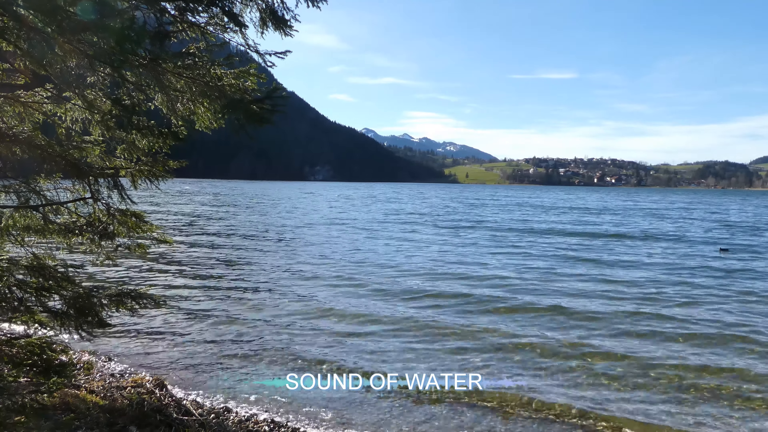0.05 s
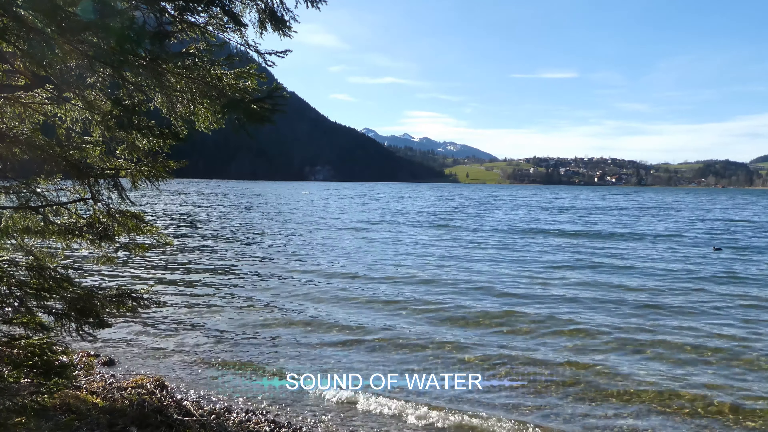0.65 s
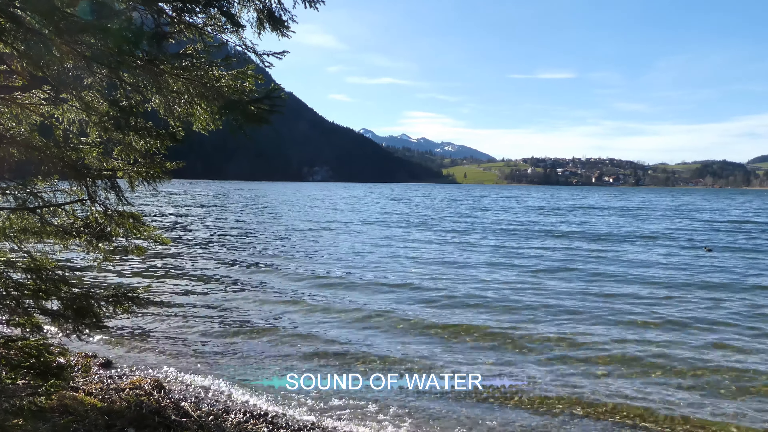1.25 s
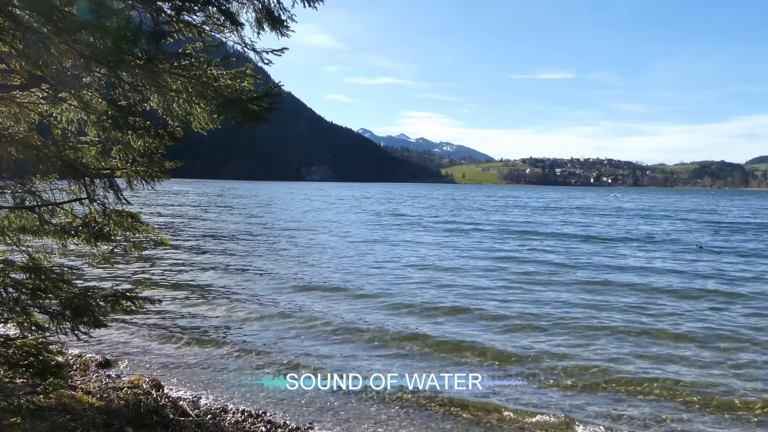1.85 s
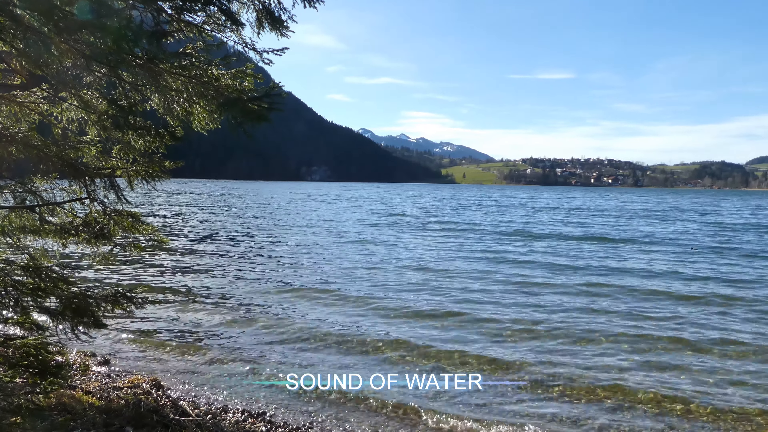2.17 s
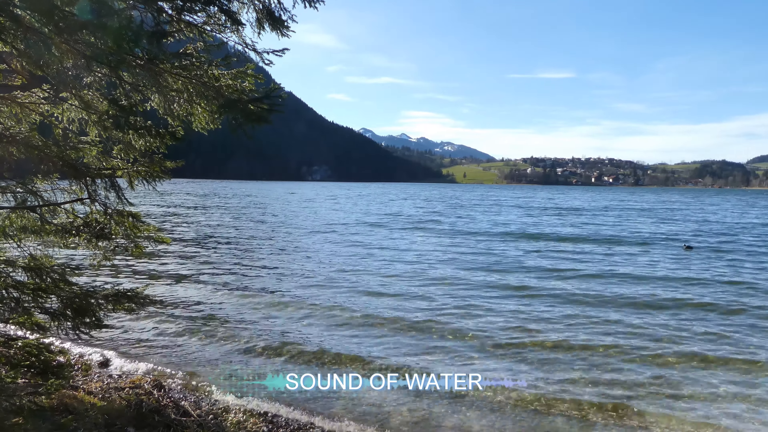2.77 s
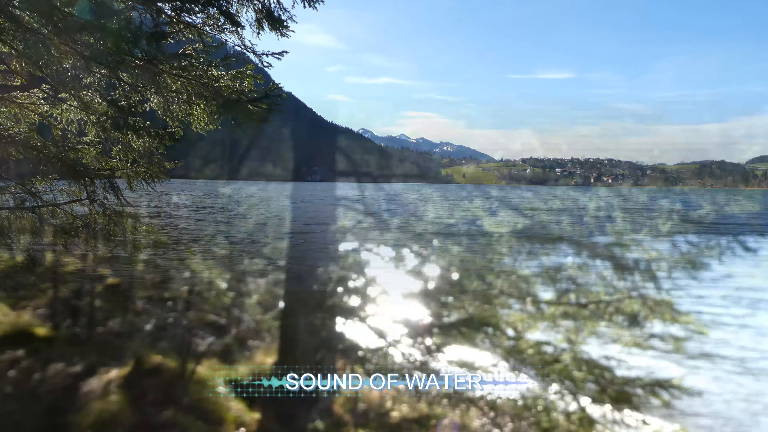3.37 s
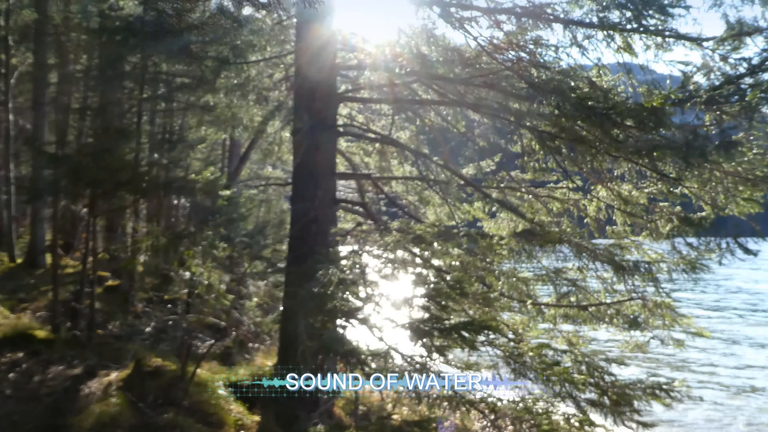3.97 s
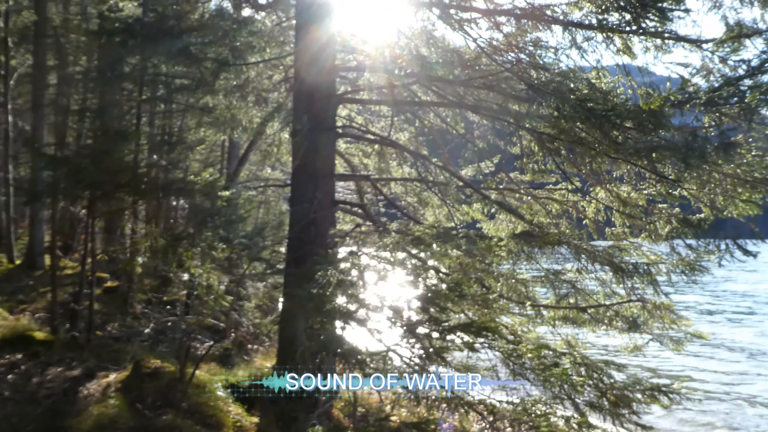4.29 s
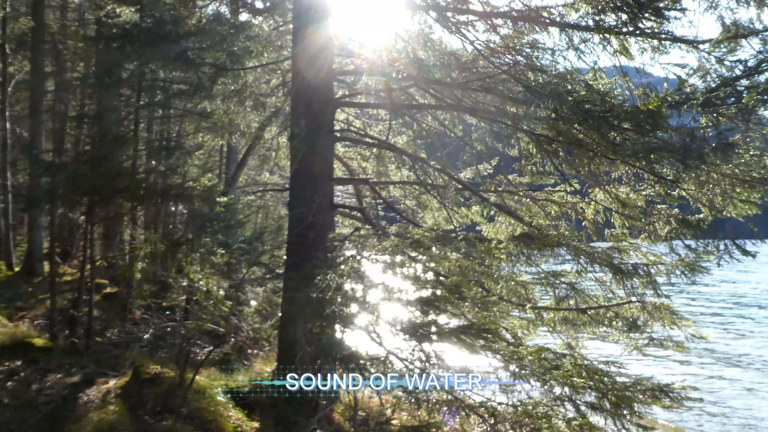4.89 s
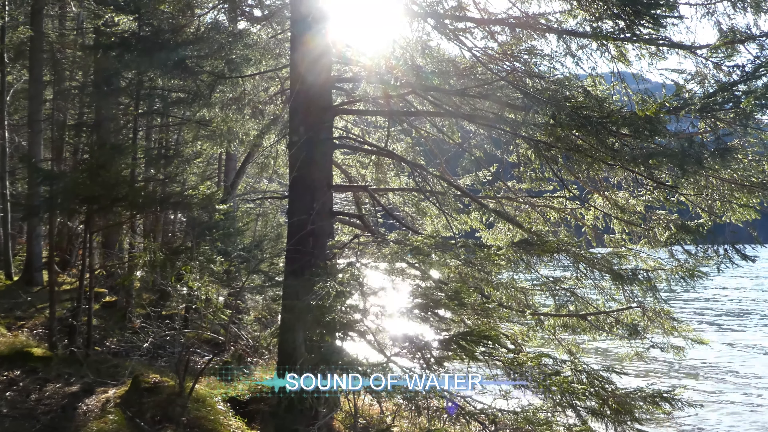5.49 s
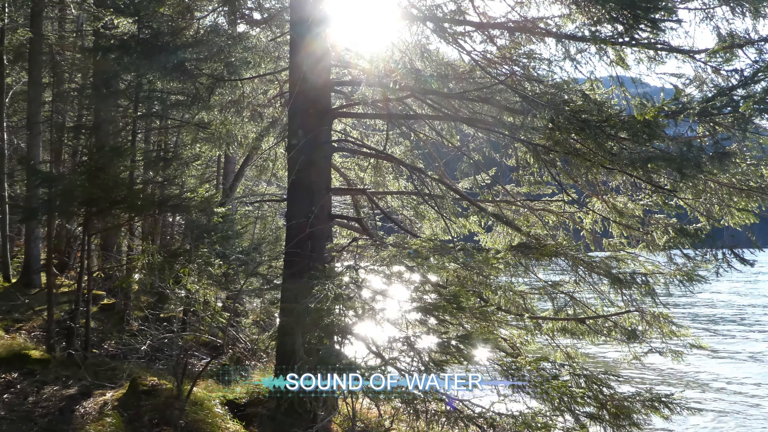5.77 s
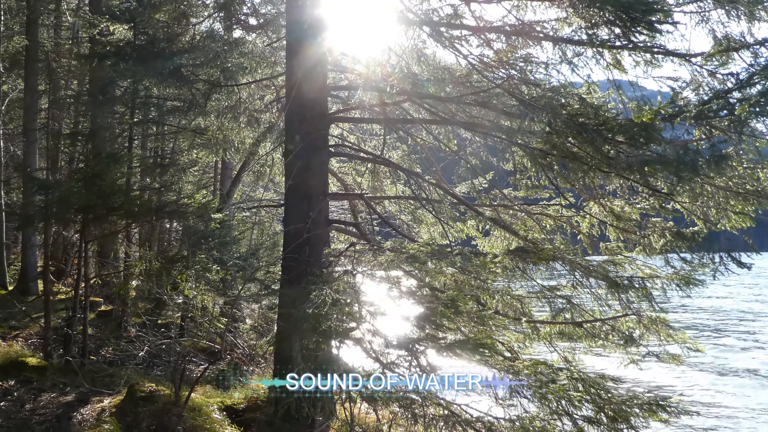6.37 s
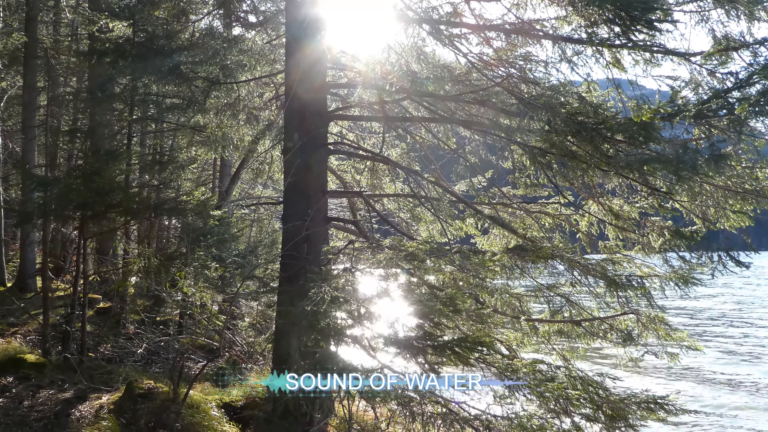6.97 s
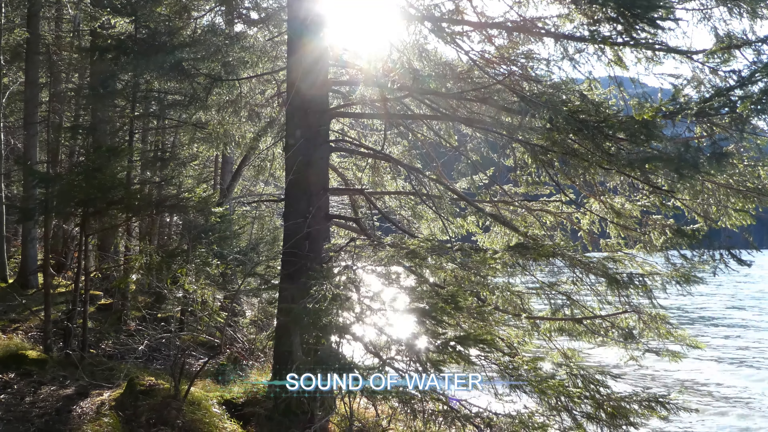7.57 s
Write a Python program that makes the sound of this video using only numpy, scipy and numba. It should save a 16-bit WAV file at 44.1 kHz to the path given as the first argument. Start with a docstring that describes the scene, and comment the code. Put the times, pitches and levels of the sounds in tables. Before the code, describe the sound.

Small lake waves wash onto a pebbly shore close by, in an uneven rhythm throughout. A wave breaks right at the start with a cluster of slaps, a soft thump and a bubbly gurgle, then fizzes up the stones. More splashes follow from about 1.3 to 2 seconds, with a smaller one near 2.6. Light gusts flutter on the microphone during these first three seconds.

Between 3 and 3.6 seconds the sound blends smoothly into a more sheltered shore and the gusts fade. A wave sloshes in around 3.5 to 3.9 seconds, followed by a lull. Further waves lap and gurgle from 5 to 6 seconds, ease off, then build to another splash near 7.5. Single drops tick on the stones and pebbles click faintly in the wash, over a very faint steady rush from across the lake.

```python
"""Small lake waves break on a pebbly shore; after three seconds the scene dissolves to a sheltered beach.
Each wave gurgles with big bubbles as it folds over, washes up the stones as a cloud of small ones
and fizzes out in spray. Crests thump and slap, small folds slosh, pebbles knock, drops tick on stones.
On the first, open beach gusts flutter on the microphone. A faint wash carries from across the lake."""
import sys
import numpy as np
from scipy import signal
from scipy.fft import rfft, irfft
from scipy.io import wavfile
from scipy.ndimage import uniform_filter1d
from numba import njit

SR = 44100
rng = np.random.default_rng(int(sys.argv[2]) if len(sys.argv) > 2 else 0)


def inscribe(sig):
    """Save sig as 16-bit PCM at rate SR to the path in sys.argv[1].

    A 1-D sig is mono; a 2-D sig holds one channel per row.
    Samples are clipped to [-1, 1] before scaling.
    """
    pcm = np.round(np.clip(np.atleast_2d(sig).T, -1, 1) * 32767)
    wavfile.write(sys.argv[1], SR, pcm.astype(np.int16))


N = 341334
T = np.arange(N) / SR
HZ = np.maximum(np.arange(N // 2 + 1) * SR / N, 1)
SIDES = np.array([[1], [-1]])  # left, right; pan is left minus right
DISSOLVE_S = (2.9, 3.57)  # open to sheltered beach


def undb(db):
    """Decibels to gain."""
    return 10 ** (np.asarray(db) / 20)


def unit(x):
    """Scale to rms 1."""
    return x / np.sqrt(np.mean(x ** 2))


def by_pitch(table):
    """Interpolate (f/Hz, value) rows at every FFT bin."""
    hz, value = np.transpose(table)
    return np.interp(np.log(HZ), np.log(hz), value)


def shape(x, gain):
    """Filter by one gain per FFT bin."""
    return irfft(rfft(x) * gain, N)


def below(hz, order):
    """Soft low-pass curve, 1/2 at hz."""
    return 1 / (1 + (HZ / hz) ** order)


def walk(rate_hz):
    """Random steps, smoothed twice; spread near 1."""
    hold = int(SR / rate_hz)
    steps = np.repeat(rng.standard_normal(N // hold + 1), hold)
    return 1.3 * uniform_filter1d(uniform_filter1d(steps, hold), hold)[:N]


def swells(peak_s, level_db, rise_s, hold_s, fall_s):
    """Summed power of events that rise, hold and fall exponentially."""
    t = np.linspace(0, N / SR, 2000)
    age_s = t[:, None] - peak_s
    fade = np.maximum(-age_s, 0) / rise_s + np.maximum(age_s - hold_s, 0) / fall_s
    return np.interp(T, t, np.sum((undb(level_db) * np.exp(-fade)) ** 2, axis=1))


@njit
def ring(start_s, hz, cycles, size, rise):
    """Bubbles: sines that swell in one cycle and decay 50 dB as pitch climbs by the fraction rise."""
    out = np.zeros((2, N))
    for k in range(len(start_s)):
        length = int(cycles[k] * SR / hz[k]) + 2
        step = 2 * np.pi * hz[k] / SR
        phasor = 1 + 0j
        pole = np.exp(1j * step - 5.76 / length)
        glide = np.exp(1j * step * rise / length)
        first = max(int(start_s[k] * SR), 0)
        for i in range(first, min(first + length, N)):
            phasor *= pole
            pole *= glide
            swing = phasor.imag * min((i - first) * hz[k] / SR, 1.)
            out[0, i] += size[0, k] * swing
            out[1, i] += size[1, k] * swing
    return out


def valley():
    """Faint steady wash of water and air from across the lake."""
    # far-shore spectrum: f/Hz, level/dB
    spectrum = [(20, -16), (45, -17), (90, -10), (128, -0.5), (170, 1), (300, -11), (480, 0), (640, 2.5),
                (900, -4.5), (2000, -14), (6000, -27)]
    common, *own = shape(rng.standard_normal((3, N)), undb(by_pitch(spectrum)))
    level_db = np.interp(T, DISSOLVE_S, (-48, -47))
    return undb(level_db) * unit(common + np.array(own))


def wind():
    """Eddies push on one microphone port and pull on the other; gusts hit fast and die away."""
    # eddy spectrum: f/Hz, level/dB
    eddies = [(25, -28), (50, 0), (85, 6), (130, 8.5), (190, 4.5), (280, -3), (600, -61)]
    # gusts: t/s, level/dB, fall/s
    gusts = [(.02, -32, 0.054), (.27, -44, 0.16), (.84, -37, 0.17), (1.41, -39.5, .15), (1.53, -35.5, 0.15),
             (1.81, -33.5, 0.21), (2.08, -41, 0.15), (2.58, -40, 0.14), (2.68, -34, 0.033),
             (2.79, -32.5, 0.1), (3.02, -44, 0.24)]
    peak_s, level_db, fall_s = np.transpose(gusts)
    gust_power = swells(peak_s, level_db, rise_s=0.041, hold_s=0.016, fall_s=fall_s)
    force = np.sqrt(gust_power + undb(-65) ** 2)  # over a steady breeze
    push, *own = shape(rng.standard_normal((3, N)), undb(by_pitch(eddies)))
    return force * (SIDES * unit(push) + undb(-9) * unit(np.array(own)))


def splashes(impacts, lag_s, scatter, cycles, spray_db, pan_db, count=8):
    """Each impact rings one main bubble and throws a quick spray of smaller and larger ones."""
    impact_s, level_db, main_hz = np.transpose(impacts)[:, :, None]
    late, pitch, swing, bearing = rng.standard_normal((len(impacts), 4, count)).transpose(1, 0, 2)
    is_spray = np.arange(count) > 0
    start_s = impact_s + is_spray * lag_s * np.abs(late)
    hz = np.minimum(main_hz * np.exp(is_spray * scatter * (pitch + .4)), SR / 3)
    size = undb(level_db) * np.where(is_spray, undb(spray_db) * swing, 1)
    pan = undb(SIDES * (pan_db + 3 * bearing.ravel()) / 2)
    return ring(start_s.ravel(), hz.ravel(), np.full(hz.size, float(cycles)), size.ravel() * pan, 0.27)


def drops():
    """Single drops tick on the stones."""
    # landings: t/s, level/dB, f/Hz
    landings = [(.206, -33, 8500), (.604, -35, 8000), (1.039, -39, 11200), (1.051, -33, 7200),
                (1.058, -35, 9200), (1.313, -36, 4800), (1.68, -34, 9000), (1.772, -32.5, 11000),
                (2.045, -34, 9200), (2.122, -34, 10000), (2.436, -34, 8100), (2.579, -40, 11000),
                (2.642, -37.5, 4980), (3.121, -38, 5000), (4.445, -40, 6360), (5.036, -30, 4110),
                (5.555, -35, 4350), (6.486, -45, 9460), (6.615, -47, 9100), (6.884, -40, 4650),
                (6.941, -39, 6220), (7.049, -35, 5100), (7.153, -38, 8500), (7.565, -31, 3540)]
    return splashes(landings, lag_s=0.0053, scatter=0.067, cycles=35, spray_db=-4.5, pan_db=-3)


def pebbles(flow, count=1400):
    """Small stones knock together at random, harder in a strong flow."""
    when, luck, bearing = rng.random((count, 3)).T
    strength = undb(-2 * np.log(luck + .02))
    knocks = np.zeros((2, N))
    knocks[:, (when * N).astype(int)] = strength * np.sqrt([bearing, 1 - bearing])
    clicks = shape(knocks, (1 - below(3000, order=4)) * below(6100, order=3))
    return undb(-55) * unit(clicks * np.sqrt(flow))


def sloshes(count=60, cycles=28.0, climb_oct=0.045):
    """Each small fold traps a swarm of bubbles near the pitch of its hollow, which climbs as it closes."""
    # folds: centre t/s, level/dB, length/s, hollow f/Hz, pitch spread/oct
    folds = [(0.189, -32, .04, 700, .25), (0.289, -32, .06, 692, 0.36), (0.731, -36.5, .05, 300, 0.22),
             (1.34, -36, .11, 665, 0.19), (1.443, -50.5, 0.088, 333, 0.24),
             (1.886, -33.5, 0.064, 343, 0.28), (2.201, -45, 0.14, 350, .2), (2.7, -42.5, .14, 332, 0.26),
             (3.69, -44, 0.11, 780, 0.23), (3.798, -33.5, 0.052, 890, .18), (3.887, -39, .07, 1050, 0.21),
             (3.952, -43, .1, 338, 0.13), (5.419, -37.5, 0.064, 810, 0.14), (5.559, -40, .14, 833, 0.26),
             (5.73, -36.5, 0.11, 810, 0.24), (6.063, -40, 0.055, 327, 0.19), (6.127, -38.5, .06, 930, .18),
             (6.831, -41.5, 0.083, 524, 0.45), (6.883, -40, 0.068, 1500, .35),
             (6.899, -43, 0.059, 600, 0.35), (7.135, -38.5, 0.037, 860, 0.18),
             (7.14, -44, 0.078, 334, 0.13), (7.33, -38.5, 0.073, 300, 0.3), (7.425, -36, 0.047, 1090, 0.15),
             (7.521, -36, 0.051, 854, 0.31)]
    out = 0
    for centre_s, level_db, length_s, hollow_hz, spread_oct in folds:
        when, pitch, swing, bearing = rng.standard_normal((4, count))
        hz = np.minimum(hollow_hz * 2 ** (spread_oct * pitch + climb_oct * when), SR / 3)
        size = swing * undb(SIDES * (-1.5 + 3 * bearing) / 2)
        swarm = ring(centre_s + when * length_s / 2, hz, np.full(count, cycles), size, 0.18)
        energy = np.mean(np.sum(swarm ** 2, axis=1))
        out = out + swarm * undb(level_db) * np.sqrt(length_s * SR / energy)
    return out


def slaps():
    """Crests slap shut on pockets of air."""
    # air pockets: t/s, level/dB, f/Hz
    pockets = [(.164, -15, 687), (.168, -15.5, 496), (.172, -15, 253), (.202, -18, 750), (.224, -21, 323),
               (.234, -14.5, 656), (.283, -24, 260), (.316, -15, 399), (.75, -20, 980), (1.099, -20.5, 700),
               (1.276, -21.5, 760), (1.35, -21.5, 655), (1.517, -17.5, 725), (1.561, -16.5, 680),
               (1.637, -17, 680), (1.645, -19.5, 290), (1.677, -14, 635), (1.676, -18, 320),
               (1.937, -23, 440), (2.553, -22, 1040), (2.99, -30, 268), (3.438, -18, 1040),
               (3.474, -28, 297), (3.628, -28.5, 198), (3.662, -20, 720), (3.674, -24.5, 320),
               (3.787, -23, 1010), (4.856, -27, 617), (5.082, -29, 288), (5.196, -19.5, 825),
               (5.25, -25, 254), (5.256, -21, 1440), (5.28, -22, 366), (5.421, -22, 765),
               (5.423, -23.5, 334), (5.61, -27, 244), (5.698, -25, 353), (5.768, -26, 364),
               (6.044, -29, 350), (6.047, -22, 980), (6.137, -24, 860), (6.149, -27, 1130),
               (6.358, -29, 1025), (6.79, -25.5, 760), (6.855, -22, 1400), (7.305, -22, 275),
               (7.448, -19.5, 303), (7.454, -28, 1525), (7.711, -22, 930), (7.718, -17, 408)]
    return splashes(pockets, lag_s=0.011, scatter=0.367, cycles=24.6, spray_db=-15.5, pan_db=1.5)


def troughs():
    """Level change in dB as the water draws back between waves."""
    # troughs: t/s, gurgle change/dB, half length/s
    ebbs = [(.1, -2, 0.039), (1.212, -1, .05), (2.482, -1, 0.084), (2.904, -2.5, 0.055), (3.138, -1.5, .14),
            (4.595, -3.5, 0.064), (6.64, 1, .11), (6.976, -0.5, 0.033), (7.59, -1, 0.037)]
    return sum(db * np.exp(-((T - centre_s) / half_s) ** 2) for centre_s, db, half_s in ebbs)


def thumps(gurgle_env):
    """Bass envelope: water drops its weight ahead of a crest and heaves under the gurgle."""
    # falls of water: t/s, level/dB
    falls = [(.11, -46.5), (.24, -45), (1.41, -52), (1.54, -44.5), (2.01, -67), (2.67, -56.5), (3.37, -59),
             (3.63, -60), (3.8, -49.5), (7.71, -48.5)]
    power = swells(*np.transpose(falls), rise_s=0.021, hold_s=0.031, fall_s=0.05)
    return np.sqrt(power + (undb(-30.5) * gurgle_env) ** 2)


def foam():
    """Fizz envelope: sheets of foam run up the pebbles."""
    # run-ups: t/s, level/dB, rise/s, hold/s, fall/s
    runups = [(0.246, -41.5, 0.55, 0.074, 0.86), (1.26, -46, 0.24, 0.28, 0.28),
              (1.64, -43.5, 0.1, 0.063, 0.37), (1.94, -45.5, 0.25, 0.16, 0.8),
              (2.544, -51.5, 0.14, 0.081, 0.15), (3.375, -48, 0.054, 0.41, 0.37),
              (3.66, -50, 0.17, 0.31, 0.26), (5.038, -50, 0.19, 0.53, .35), (5.327, -48.5, 0.16, .3, .35),
              (5.707, -47.5, .1, 0.086, 0.3), (6.853, -57, 0.052, 0.33, .3), (7.25, -48.5, 0.17, .17, 0.37),
              (7.463, -47.5, 0.14, .33, .3)]
    return np.sqrt(swells(*np.transpose(runups)) + undb(-55.5) ** 2)  # over steady ripples


def surge(hold_s=0.085, ripple_db=-52.5):
    """Envelopes of gurgle, wash, sift and fizz, and the wash pan: each wave builds, breaks and drains."""
    # waves: break t/s, wash level/dB, build-up/s, drain/s, gurgle re wash/dB, pan/dB
    waves = [(0.195, -39, .01, 0.08, 6, -14), (0.28, -30.6, 1, 0.52, 0.5, -6),
             (0.58, -33.5, 0.26, 0.62, -4, -1.5), (1.31, -36, 0.21, 0.13, -3.5, -3),
             (1.6, -33.5, 0.16, 0.26, 1.5, -8.5), (1.67, -40, 0.018, 0.036, 6.5, -5),
             (2.0, -33.5, 0.96, 0.48, -1, -4.5), (2.34, -37, 0.71, 0.36, -5.5, -4),
             (2.63, -37.5, 0.2, 0.3, -1, 2.5), (3.44, -36, 0.3, 0.72, -1.5, -2.5),
             (3.65, -46, 0.036, .06, 7.5, -6), (3.8, -35.5, 0.39, 0.32, -2, -3.5),
             (4.41, -45.5, 0.041, 0.99, -4, -2), (5.07, -38.5, 0.54, 0.23, -6, -8),
             (5.3, -35, 0.48, 0.41, 0, -3.5), (5.69, -35.5, 0.29, 0.38, -2.5, -0.5),
             (6.06, -40, 0.48, 0.63, -2.5, -6), (6.85, -43.5, 0.13, 0.3, -4, -11.5),
             (7.46, -32, 0.43, 0.4, -3.5, -4), (7.73, -35.5, 0.1, .3, 3, -10)]
    break_s, wash_db, build_s, drain_s, gurgle_db, pan_db = np.transpose(waves)

    def envelope(level_db, lead_s=0, stretch=1):
        """All waves over the steady ripples."""
        power = swells(break_s - lead_s, level_db, build_s * stretch, hold_s, drain_s * stretch)
        return np.sqrt(power + undb(ripple_db) ** 2)

    gurgle = envelope(wash_db + gurgle_db, lead_s=0.016, stretch=0.81)  # big bubbles come and go first
    left, right = envelope(wash_db + pan_db / 2), envelope(wash_db - pan_db / 2)
    wash = np.sqrt(left * right)
    fizz = foam()
    sift = np.sqrt(wash * fizz)
    ebb_db = troughs()
    return gurgle * undb(ebb_db), wash * undb(0.26 * ebb_db), sift, fizz, 20 * np.log10(left / right)


def cloud(low_hz, high_hz, cycles, scatter, blur_db, clump_db, count):
    """Mid and side of many ringing bubbles, over the blur of those too far off to tell apart."""
    when, pitch, life, luck, bearing = rng.random((count, 5)).T
    hz = low_hz * (high_hz / low_hz) ** pitch
    size = hz * undb(-scatter * np.log(luck + 0.019))  # short high rings need more swing
    angle = 2 * np.pi * bearing
    mid_side = np.array([np.cos(angle), np.sin(angle)])
    bubbles = ring(when * N / SR, hz, cycles * (.5 + life), size * mid_side, 0.09)
    blur = rng.standard_normal((2, N))
    clumps = undb(clump_db * walk(20))  # air goes under in clumps
    return clumps * (unit(bubbles) * np.sqrt((high_hz - low_hz) / (SR / 2)) + undb(blur_db) * blur)


def on_beach(water, power_share, band_hz):
    """Mid/side to left/right, coloured by each beach in turn; mid has rms 1 inside band_hz."""
    # surf spectrum, open beach: f/Hz, level/dB
    open_beach = [(50, -18), (100, -24), (180, -11), (270, -3), (360, -3), (510, -5.5), (700, -2),
                  (810, -6.5), (890, -7.5), (1020, -3), (1400, -6), (2900, -8.5), (8100, -20.5),
                  (9700, -17), (15500, -31)]
    # surf spectrum, sheltered beach: f/Hz, level/dB
    sheltered_beach = [(50, -20), (100, -11), (220, -3.5), (365, -1.1), (440, -4.5), (505, -8.5), (590, -4),
                       (760, -1.6), (900, 0), (1450, -2.1), (1700, -1.5), (3000, -8), (4700, -15),
                       (8100, -24), (9700, -21.5), (15500, -35.5)]
    # likeness of the surf at the two ears: f/Hz, correlation
    likeness = [(100, 1), (300, 0.91), (650, 0.91), (1400, 0.66), (3100, 0.81), (7000, 0.73), (10000, 0.55),
                (15000, 0.09)]
    correlation = np.clip(by_pitch(likeness), 0, .98)
    mid, side = rfft(water) * np.sqrt(power_share)
    side = side * np.sqrt((1 - correlation) / (1 + correlation))
    inside = (HZ > band_hz[0]) & (HZ < band_hz[1])
    dissolve = np.interp(T, DISSOLVE_S, (0, 1))
    out = 0
    for beach, weight in ((open_beach, 1 - dissolve), (sheltered_beach, dissolve)):
        colour = undb(by_pitch(beach))
        rms = np.sqrt(2 * np.sum(np.abs(mid * colour)[inside] ** 2)) / N
        out = out + weight * irfft((mid + SIDES * side) * colour, N) / rms
    return out


def surf():
    """Waves heave in; big bubbles gurgle, small ones wash up and sift through stones, the finest fizz."""
    gurgle_env, wash_env, sift_env, fizz_env, wash_pan_db = surge()
    gurgle_pan_db = np.interp(T, DISSOLVE_S, (-1, 5.5))
    # bubble size sets pitch: each part has a band that blends into the next
    deep, low = below(188, order=8), below(850, order=6)
    middle, upper = below(2870, order=8), below(6760, order=8)
    heave = on_beach(rng.standard_normal((2, N)), deep * (1 - below(145, order=4)), (80, 170))
    big = cloud(169.9, 1288, cycles=39, scatter=1.6, blur_db=-2.9, clump_db=0.097, count=5000)
    gurgle = on_beach(big, low * (1 - deep), (150, 900))
    small = cloud(639.5, 4238, cycles=56.5, scatter=0.99, blur_db=0.79, clump_db=0.13, count=11000)
    wash = on_beach(small, (1 - low) * middle, (1000, 4000))
    fine = cloud(2320, 8070, cycles=57, scatter=2.5, blur_db=0, clump_db=0.27, count=26000)
    sift = on_beach(fine, (1 - middle) * upper, (3000, 6000))
    finest = cloud(4740, 15500, cycles=34, scatter=3.1, blur_db=1.3, clump_db=0.99, count=45000)
    fizz = on_beach(finest, 1 - upper, (6000, 15000))
    return (heave * thumps(gurgle_env) * undb(SIDES * gurgle_pan_db / 4)
            + gurgle * gurgle_env * undb(-0.9 + SIDES * gurgle_pan_db / 2)
            + wash * wash_env * undb(-1.5 + SIDES * wash_pan_db / 2)
            + sift * sift_env * undb(-1.12 + SIDES * wash_pan_db / 3)
            + fizz * fizz_env * undb(-2.07 - SIDES * 0.2)
            + pebbles(wash_env))


def scene():
    """Surf with slaps, sloshes and drops, wind and the far shore."""
    crests = undb(-3) * slaps()
    ticks = undb(2.5) * drops()
    folds = undb(-1) * sloshes()
    pockets = shape(folds + crests, 1 - below(130, order=6))  # small air pockets radiate no deep bass
    return surf() + pockets + ticks + undb(-5.5) * wind() + valley()


def record(dry):
    """Steep low-pass at 15.6 kHz."""
    return signal.sosfilt(signal.ellip(10, .2, 70, 15600, fs=SR, output="sos"), dry)


dry = scene()
out = record(dry)
inscribe(out)
```